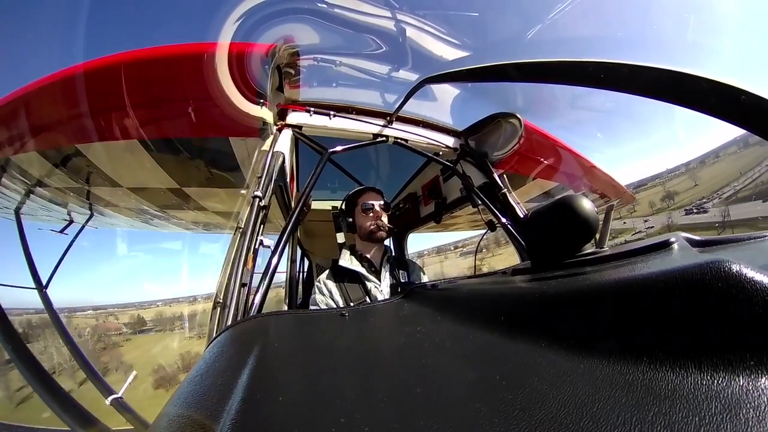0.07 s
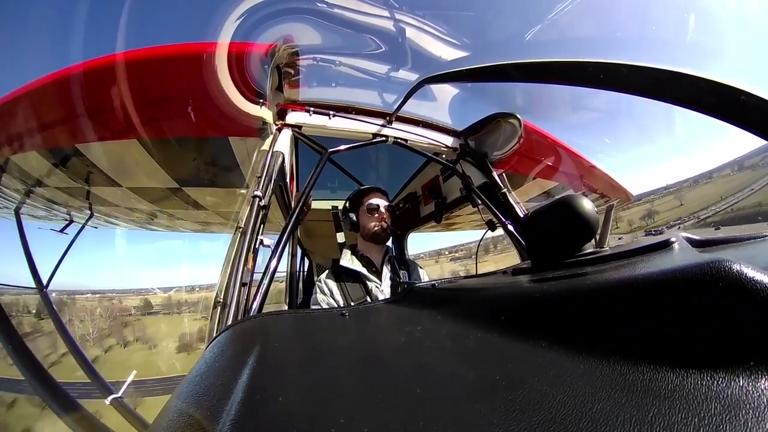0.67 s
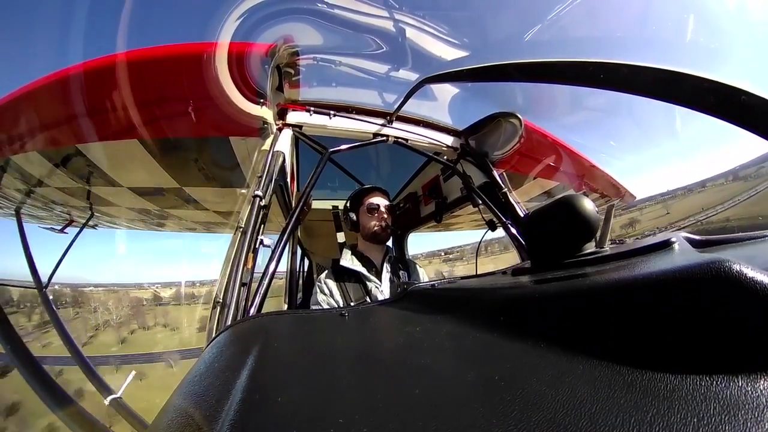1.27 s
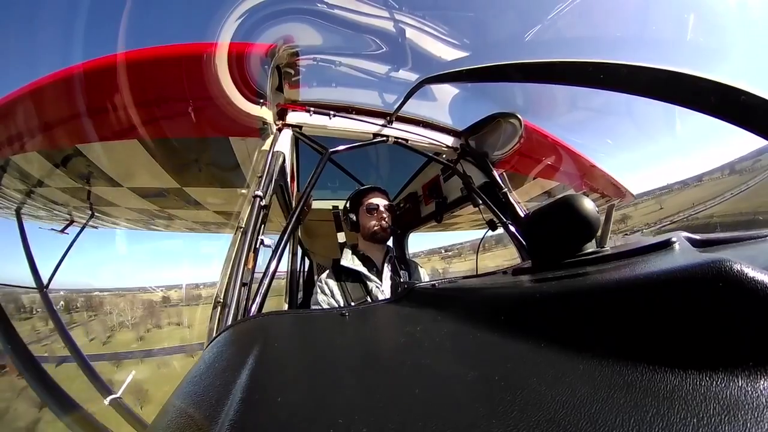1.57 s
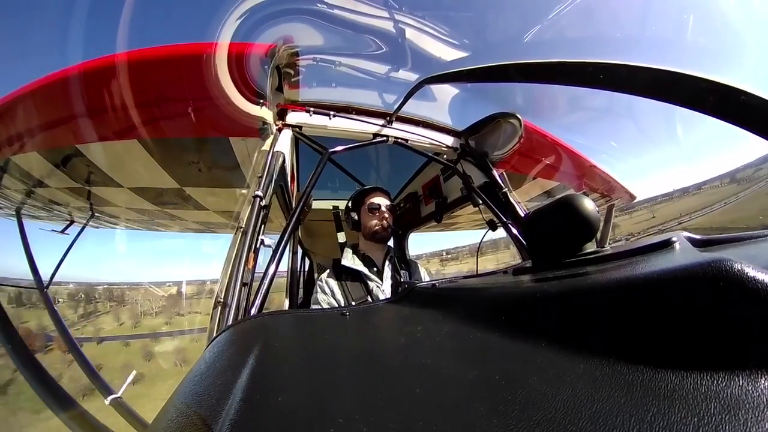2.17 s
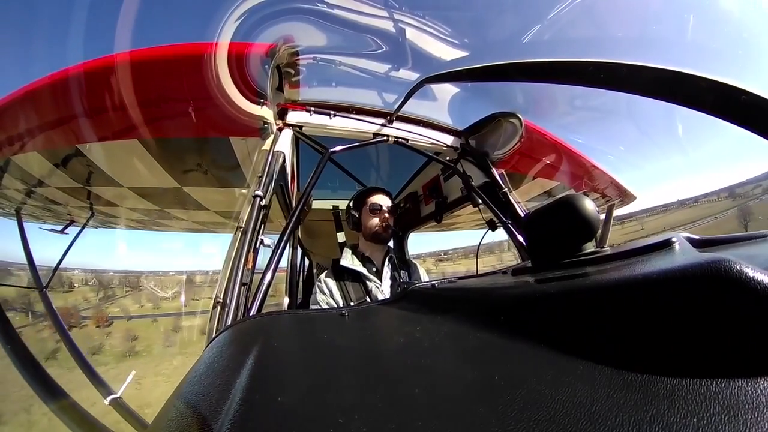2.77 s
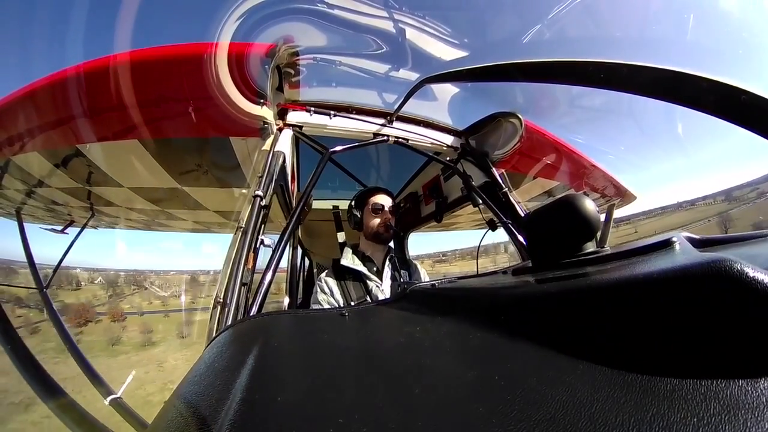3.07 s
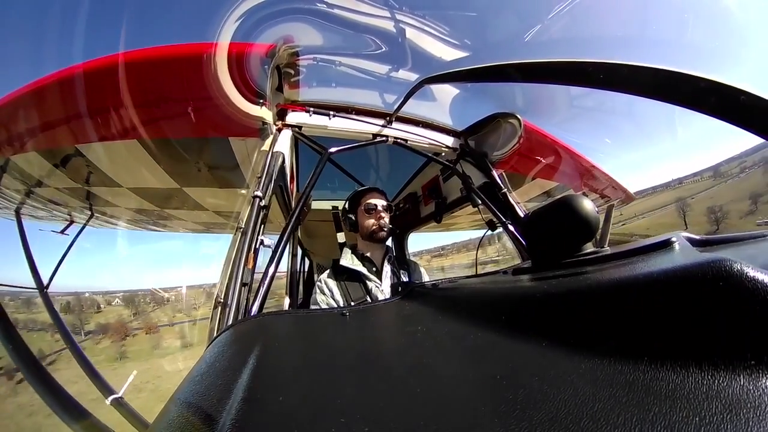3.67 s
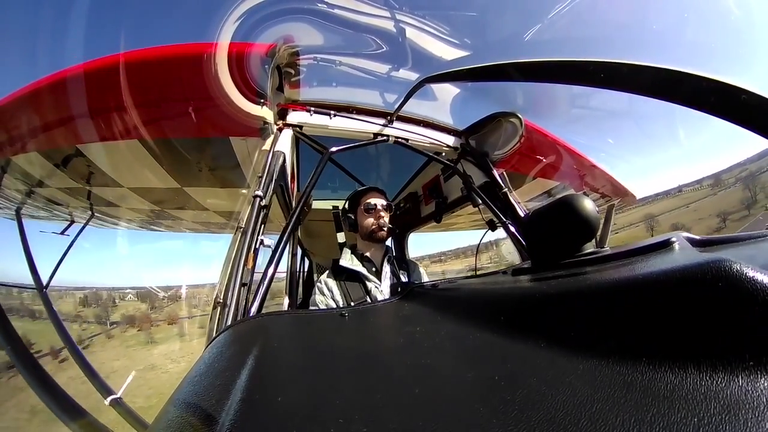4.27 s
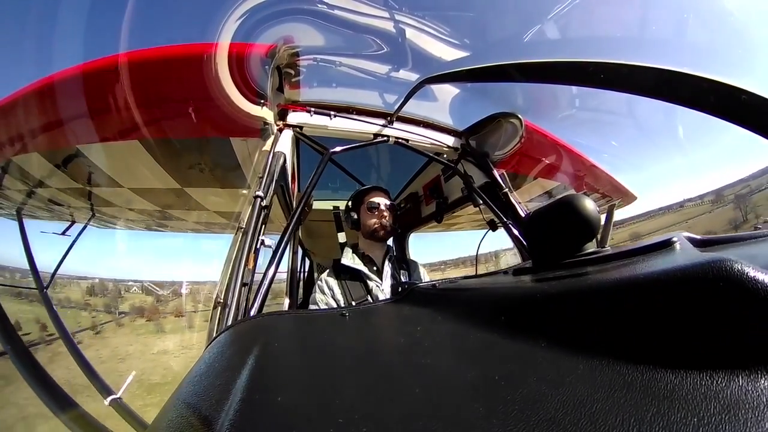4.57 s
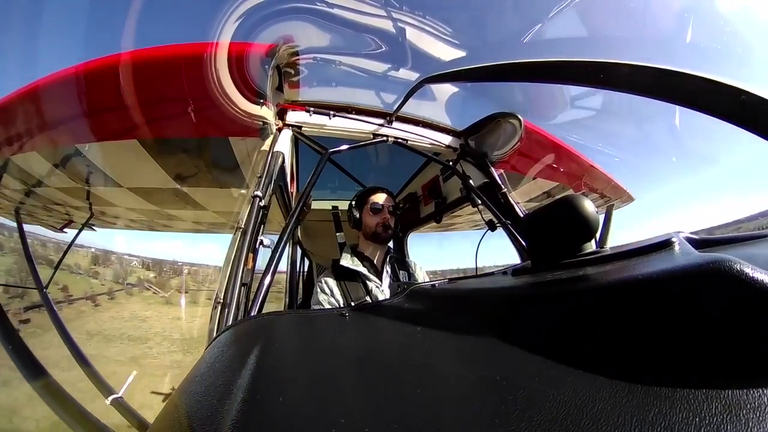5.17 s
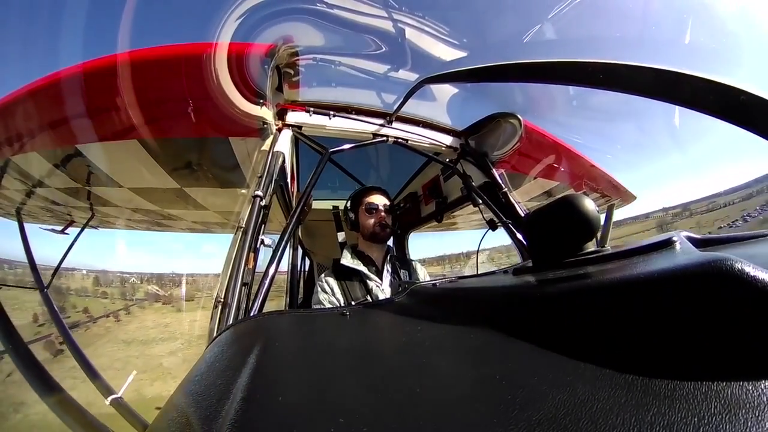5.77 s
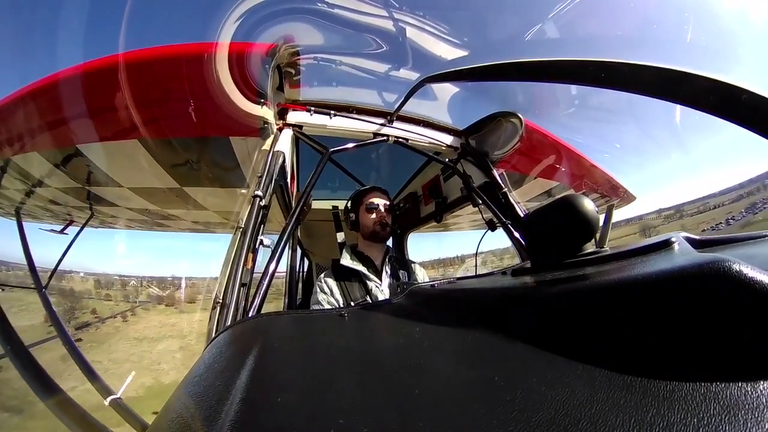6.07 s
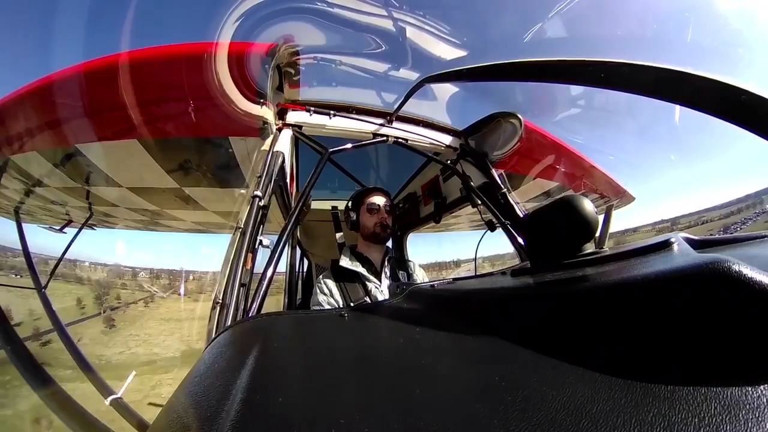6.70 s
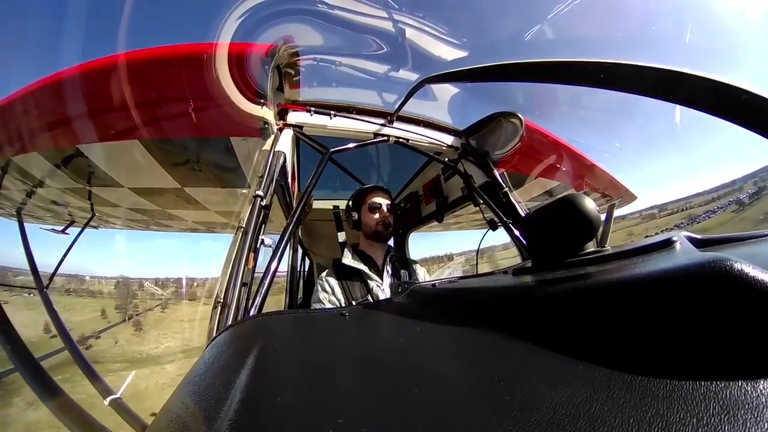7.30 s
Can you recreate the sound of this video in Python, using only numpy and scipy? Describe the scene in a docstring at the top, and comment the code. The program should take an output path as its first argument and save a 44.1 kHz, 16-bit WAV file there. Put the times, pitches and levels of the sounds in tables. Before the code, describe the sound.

A light aircraft's engine and propeller drone continuously, heard close up in stereo from within the cabin, with air rumbling past and small shudders of the airframe. The pitch eases slowly down as the engine pulses more unevenly. From about halfway, irregular wind buffeting adds booms and fluttering slaps, growing strongest toward the end, where it overloads the microphone with sharp crackles.

```python
"""Cockpit of a light aircraft in a turn, heard from a stereo microphone inside the cabin.
At first the two-blade propeller drones over the four-cylinder engine's exhaust and the slipstream.
From about 2 s the engine slowly loses speed and lopes harder. From 4 s the blades meet gusts: the cabin
booms and each pass slaps the windscreen. After 6 s the hardest slaps crackle and hit the limiter."""
import sys
import numpy as np
from scipy import signal
from scipy.fft import rfft, irfft, next_fast_len
from scipy.io import wavfile
from scipy.ndimage import uniform_filter1d, minimum_filter1d

SR = 44100
rng = np.random.default_rng(int(sys.argv[2]) if len(sys.argv) > 2 else 0)


def generate_wav(sig):
    """Save sig (samples, or channels by samples) to the path in sys.argv[1] as 16-bit PCM at SR."""
    pcm = np.round(np.clip(np.atleast_2d(sig).T, -1, 1) * 32767).astype(np.int16)
    wavfile.write(sys.argv[1], SR, pcm)


N = 323694
TIME = np.arange(N) / SR
PASSES_PER_CYCLE = 4   # one cylinder fires for every blade pass

# spectrum of tumbling air and exhaust gas: f/Hz, relative density/dB
RUMBLE_SPECTRUM = [(20, -44.5), (45, -35), (80, -11.5), (125, 1.5), (200, 0.5), (320, 0), (430, -2),
                   (560, -8), (900, -15.5), (1100, -34.5), (1600, -47.5), (3000, -71.5), (15000, -89.5)]
# the cabin's lean to one side at the microphone: f/Hz, left minus right/dB
CABIN_BALANCE = [(30, -9), (70, -1), (140, 8.5), (320, 7), (500, 4), (750, 6), (1130, 0), (2600, -0.5),
                 (9000, -5.5)]


def drone(passes, waver_db=0.83, flutter_db=1.3, flutter_hz=9, flutter_radians=0.16):
    """The blades' steady pressure field: three tones that crest together and flutter in uneven inflow."""
    # lowest propeller tones: t/s, first/dB, second/dB, third/dB
    tone_levels = [(0.0, -30, -31, -25), (0.5, -32.5, -23.5, -26.5), (1.0, -29.5, -24.5, -28.5),
                   (1.65, -29.5, -20, -28.5), (1.951, -37, -26.5, -23), (2.9, -49, -48, -20.5),
                   (3.45, -43, -27.5, -23.5), (3.75, -49, -35, -17.5), (3.92, -46, -46, -23.5),
                   (4.15, -38, -27.5, -24), (4.4, -33.5, -27.5, -18), (4.65, -37, -35, -24.5),
                   (4.95, -34, -20.5, -21.5), (5.15, -39.5, -28.5, -38), (5.849, -34, -28.5, -28.5),
                   (6.249, -46.5, -13.5, -24), (6.949, -43, -52, -29.5), (7.3, -47, -50, -16)]
    crest = np.interp(TIME, [3.8, 5.0], [.29, -.04])   # in rough air the crest moves onto the slap
    tones = 0
    for k, level_db in enumerate(in_time(tone_levels), 1):
        gain = from_db(level_db + waver_db * drift(0.46) + flutter_db * drift(flutter_hz))
        phase = 2 * np.pi * k * (passes - crest) + flutter_radians * drift(flutter_hz)
        tones = tones + gain * np.cos(phase)
    return np.sqrt(2) * tones * pan(left_db=4.0)


def overtones(passes, rate, waver_db=2.55, top_harmonic=15):
    """The drone's upper harmonics rise and sink as the speed slides them through cabin resonances."""
    # harmonics as the cabin passes them: f/Hz, level/dB
    cabin_response = [(250, -28), (268, -41), (276, -32), (320, -36), (345, -36), (398, -31), (415, -42.5),
                      (480, -37.5), (540, -47.5), (620, -46.5), (690, -45.5), (760, -61.5), (830, -47.5),
                      (900, -52.5), (1000, -53.5), (1100, -60.5)]
    tones = 0
    for k in range(4, top_harmonic + 1):
        level_db = at_hz(cabin_response, k * rate) + waver_db * drift(16.0)
        tones = tones + from_db(level_db) * np.cos(2 * np.pi * (k * passes + rng.random()))
    return np.sqrt(2) * tones * pan(left_db=0.0)


def gusts(rise_db_per_s=411, fall_db_per_s=250, lull_boom_db=-19.5, lull_slap_db=-44):
    """Drive of boom and slap in dB: each gust rises, holds and falls back to the lull."""
    # gusts that meet the propeller: start/s, length/s, boom drive/dB, slap drive/dB
    gust_events = [(4.111, 0.11, -17, -39.5), (4.269, 0.073, -22.5, -35.5), (4.336, 0.035, -17.5, -37),
                   (4.418, 0.058, -15, -46), (4.754, 0.06, -15, -29.5), (4.854, 0.15, -10, -24.5),
                   (5.364, 0.043, -15.5, -47), (5.513, 0.17, -15.5, -37), (5.785, 0.044, -19, -33.5),
                   (5.874, 0.025, -12, -45), (5.952, 0.033, -11, -23.5), (6.031, .07, -11, -32.5),
                   (6.109, 0.12, -5.5, -19), (6.271, 0.042, -5.5, -16.5), (6.317, 0.14, -9, -18),
                   (6.476, 0.245, -11, -18), (6.727, 0.4, -18, -22.5), (6.822, 0.012, -11.5, -19),
                   (7.062, 0.19, -13, -18.5), (7.247, 0.21, -8.5, -14.5)]
    boom_db, slap_db = np.full(N, lull_boom_db), np.full(N, lull_slap_db)
    for start, length, top_boom_db, top_slap_db in gust_events:
        rise_db = rise_db_per_s * (TIME - start)
        fall_db = fall_db_per_s * (start + length - TIME)
        shape_db = np.minimum(0, np.minimum(rise_db, fall_db))
        boom_db = np.maximum(boom_db, top_boom_db + shape_db)
        slap_db = np.maximum(slap_db, top_slap_db + shape_db)
    return boom_db, slap_db


def boom(passes, rate, boom_db, push_s=0.0005):
    """Each blade's pressure push sets the cabin ringing; hard pushes ring out of proportion."""
    # cabin resonances at the microphone: f/Hz, width/Hz, left/dB, right/dB
    cabin_modes = [(189, 18, -4.5, -9), (239.2, 6.7, 9.5, 4.5), (276.7, 45, 5.5, 0), (298, 21, -5.5, 9.5),
                   (364.7, 29, 11.5, 7.5), (422.3, 19, 3.5, 3), (599, 91, 8, -9.5)]
    since, strength = blade_clock(passes, rate, lead_s=0.00083, jitter_s=.00008, uneven_db=2.5)
    push = strength * bell(since, push_s)
    share_db = np.interp(boom_db, [-24, -15], [-9.0, -1.0])
    return ring(push, cabin_modes) * from_db(boom_db + share_db)


def hard_slaps(slap_db, reach_s=0.0085):
    """Single blade passes slap with a force of their own."""
    # hard passes: t/s, slap drive/dB
    hard_passes = [(4.443, -37), (4.474, -30), (4.491, -32.5), (4.556, -32), (4.683, -30), (4.875, -25),
                   (4.907, -22), (4.939, -22), (4.987, -24), (5.259, -33.5), (5.307, -36), (5.418, -39),
                   (5.530, -32), (5.579, -29.5), (5.692, -30), (5.788, -32), (5.949, -27), (6.079, -26.5),
                   (6.279, -8), (6.295, -12), (6.791, -27), (6.826, -18.5), (7.009, -13), (7.297, -9)]
    for s, level_db in hard_passes:
        slap_db = np.where(np.abs(TIME - s) < reach_s, level_db, slap_db)
    return slap_db


def slap(passes, rate, slap_db, edge_s=0.0001, lobe_s=0.00037, swish_s=0.0015, wave_db=10):
    """A blade in rough air throws an N-shaped wave that rings the windscreen, and a turbulent swish."""
    # windscreen resonances: f/Hz, width/Hz, gain/dB
    windscreen_modes = [(602, 100, -8), (900, 170, -7), (1243, 280, 1.5), (2250, 450, -3)]
    # turbulence round the blade: f/Hz, relative density/dB
    swish_spectrum = [(150, -13.5), (400, -6.5), (650, 11.5), (1000, 14), (1350, 3), (1650, -13.5),
                      (2300, -14), (2800, -18.5), (3300, -36.5), (6000, -63), (15000, -74.5)]
    since, strength = blade_clock(passes, rate, lead_s=0.00024, jitter_s=.00002, uneven_db=1.9)
    edge = edge_s * np.interp(slap_db, [-40, -24, -21.5], [2.6, 2.3, 1.0])   # strong waves steepen
    arrival = left_first(since, gap_s=0.00018)
    wave = -np.tanh(arrival / edge) * bell(arrival, lobe_s)
    ringing = sum(resonate(wave, hz, width) * from_db(db) for hz, width, db in windscreen_modes)
    smack = from_db(wave_db) * (wave + ringing * pan(left_db=-5.0))
    swish = even(noise(swish_spectrum), size=121) * bell(since, swish_s)
    swish_db = np.interp(slap_db, [-27, -20], [8.5, 4.5])   # a steep wave outweighs its swish
    share_db = np.interp(slap_db, [-47, -35], [-6.0, 0.0])
    return strength * from_db(slap_db + share_db) * (smack + from_db(swish_db) * swish)


def cracks(passes, rate, force_db, overload_db=-14, crackle_db=-25.5, snap_db=-6.5, fizz_db=-0.5):
    """The hardest slaps overload the recorder and crackle with a snap and fizz, singly or every pass."""
    # lone sharp cracks: t/s, height/dB
    lone_cracks = [(4.3557, -41), (4.9377, -32), (4.9846, -31), (5.9494, -42), (6.311, -16.5),
                   (6.361, -22.5), (6.743, -30.5), (6.81, -31), (6.8261, -25.5), (6.843, -36),
                   (6.8756, -38), (6.961, -36), (7.008, -37), (7.078, -24), (7.148, -26), (7.281, -15.5),
                   (7.297, -17)]
    # colour of snap and fizz: f/Hz, relative density/dB
    crack_spectrum = [(800, -2), (1500, 13), (2200, 11), (4500, -1), (7000, -8.5), (10000, -15),
                      (15000, -23.5)]
    since, strength = blade_clock(passes, rate, lead_s=0.00026, jitter_s=.00002, uneven_db=2.5)
    over_db = force_db - overload_db
    cut_in_db = 11 * np.minimum(over_db, 0)   # the crackle dies quickly below the overload threshold
    height = strength * from_db(crackle_db + 0.4 * over_db + cut_in_db)
    for s, height_db in lone_cracks:
        height[np.round(passes) == np.round(np.interp(s, TIME, passes))] = from_db(height_db)
    fizz = bell(since, 0.00086) * noise(crack_spectrum)
    arrived = np.sign(left_first(since, gap_s=0.00016))
    clicks = np.maximum(np.diff(arrived, prepend=1), 0)
    snap = fizz.std() * tint(clicks, crack_spectrum)
    return height * (from_db(snap_db) * snap + from_db(fizz_db) * fizz) * pan(left_db=4.0)


def exhaust(passes, uneven_db=11.0, puff=0.73, rise_passes=0.089, decay_passes=1.0, top_hz=1000):
    """Each cylinder barks into the pipe with a puff of gas; unequal strengths make the engine lope."""
    # cylinders in firing order: exhaust opens/blade passes, relative strength/dB
    cylinders = [(0.268, 6.5), (1.329, -2.5), (2.29, -6), (3.288, -13.5)]
    # exhaust pipe resonances: f/Hz, width/Hz, left/dB, right/dB
    pipe_modes = [(163, 7.7, -12.5, -11.5), (274, 48, 6.5, -3), (334, 47, 13, 0), (413, 25, 0.5, -4.5),
                  (497, 7.5, 2, -5), (690, 29, -24, -12.5), (830, 94, -20, -13.5)]
    bark, gas = np.zeros(N), np.zeros(N)
    for opens, level_db in cylinders:
        cycle = ((passes - opens) // PASSES_PER_CYCLE).astype(int) + 1
        age = (passes - opens) % PASSES_PER_CYCLE
        strength = from_db(level_db + uneven_db * rng.uniform(0.37, 1, cycle[-1] + 1))[cycle]
        bark += strength * np.diff(cycle, prepend=cycle[0])
        gas += strength * np.exp(-age / decay_passes) * (1 - np.exp(-age / rise_passes)) ** 2
    puffs = puff * rms_one(gas * noise(RUMBLE_SPECTRUM))
    return lowpass(ring(bark, pipe_modes) + puffs, top_hz, order=6)


def lope(passes, crest_passes=0.96):
    """One cylinder outweighs the rest, so the sound swells once in every engine cycle; in dB."""
    # throb of the labouring engine: t/s, swing/dB
    lope_depth = [(2.0, 1.6), (2.6, 3.0), (3.8, 3.0), (4.4, 1.2)]
    swing_db, = in_time(lope_depth)
    return swing_db * np.cos(2 * np.pi * (passes - crest_passes) / PASSES_PER_CYCLE)


def buzz(passes, rate, scatter_db=5.0, trade_hz=0.2635, count=66, size=4096):
    """The airframe shakes with each engine cycle: close lines between the blade tones, slowly shifting."""
    # airframe vibration lines: f/Hz, relative level/dB
    buzz_spectrum = [(90, -13.5), (150, 7), (200, -2), (300, 5.5), (370, -5), (470, -2), (560, -9.5),
                     (700, -4), (770, -22), (890, -18.5), (1000, -28.5), (1100, -30.5)]
    multiple = np.arange(count)
    hz = multiple * rate.mean() / PASSES_PER_CYCLE
    between_blade_tones = multiple % PASSES_PER_CYCLE > 0
    lines = from_db(at_hz(buzz_spectrum, hz)) * between_blade_tones * (hz > buzz_spectrum[0][0])
    place = passes / PASSES_PER_CYCLE % 1 * size
    shake = 0
    for turn in (np.cos, np.sin):   # two patterns of vibration give way to each other
        shared = np.exp(2j * np.pi * rng.random(count))
        per_side = np.exp(2j * np.pi * rng.random((2, count)))
        scatter = from_db(scatter_db * rng.standard_normal(count))
        weights = lines * scatter * (shared + 0.5 * per_side) * pan(at_hz(CABIN_BALANCE, hz))
        pattern = [np.interp(place, np.arange(size), side, period=size) for side in irfft(weights, size)]
        shake = shake + turn(2 * np.pi * trade_hz * TIME) * np.array(pattern)
    return rms_one(shake)


def shudders():
    """Strong engine beats and small bumps of air shake the cabin shell for a moment."""
    # brief shudders: t/s, half width/s, level/dB
    bumps = [(0.019, 0.0091, -18.5), (0.084, .012, -20.5), (0.311, 0.015, -24.5), (0.539, 0.029, -24),
             (0.61, 0.047, -27), (0.877, .012, -32), (0.941, 0.013, -21.5), (1.001, 0.019, -24.5),
             (1.98, 0.0074, -20), (2.064, .012, -21.5), (2.161, 0.023, -23), (2.518, 0.016, -18),
             (2.635, 0.02, -23), (2.699, 0.02, -20.5), (2.753, 0.015, -22), (2.816, 0.017, -17.5),
             (2.937, 0.02, -20), (3.058, 0.017, -17), (3.177, 0.017, -20.5), (3.302, 0.026, -20.5),
             (3.354, 0.016, -22.5), (3.41, 0.024, -21), (3.48, 0.013, -23), (3.561, 0.019, -20),
             (3.608, 0.015, -18.5), (3.672, 0.025, -28.5), (3.735, 0.021, -20.5), (3.787, 0.018, -21.5),
             (4.125, 0.021, -16), (4.355, 0.016, -16), (4.464, 0.031, -21), (4.685, 0.017, -23),
             (5.25, 0.028, -18), (5.39, 0.015, -23.5), (5.65, 0.025, -21.5)]
    # colour of the shaken shell: f/Hz, relative density/dB
    shell_spectrum = [(35, -70), (70, -38), (100, -18.5), (200, -9), (290, 11), (400, 7.5), (480, -1),
                      (700, -12), (950, -16), (1300, -60.5), (3000, -75), (8000, -110)]
    swell = sum(from_db(top_db) * bell(TIME - s, width) for s, width, top_db in bumps)
    shell = even(tint(rng.standard_normal(N), shell_spectrum), size=441)
    return swell * shell * pan(left_db=5.5)


def slipstream(passes, swell_db, boom_db, slap_db, level_flight_db=-24, chop=0.21):
    """Air tumbles over the cabin, chopped by the blades, and hisses at the door seals."""
    # slipstream over the cabin: t/s, level against level flight/dB
    airflow = [(0.0, -2), (0.4, -2), (0.55, 1.5), (1.15, 0.5), (1.55, 3.5), (2.1, 3.5), (2.4, 3),
               (3.15, 0.5), (3.4, 3), (3.75, 6), (3.88, -2.5), (4.03, 6), (4.17, 7.5), (4.7, 4.5), (5.0, 8),
               (5.15, -1.5), (5.45, 2), (5.6, 4.5), (7.0, 5.5)]
    # hiss at the door seals: t/s, level/dB
    seal_level = [(0.0, -45), (0.27, -43), (0.4, -43), (0.55, -43), (0.72, -40), (0.95, -40.5),
                  (1.5, -40.5), (1.9, -39.5), (2.27, -41.5), (2.5, -41), (3.17, -42.5), (3.3, -40),
                  (3.5, -37.5), (3.9, -42.5), (4.0, -37), (4.7, -39.5), (5.22, -37.5), (5.42, -41.5),
                  (5.6, -39), (7.0, -36.5)]
    # colour of that hiss: f/Hz, relative density/dB
    seal_spectrum = [(300, 1), (700, 0), (900, 5), (1120, 0.5), (1380, -0.5), (1620, -11), (1880, -8),
                     (2200, -17), (2800, -17), (3300, -25.5), (4200, -31), (5000, -33.5), (7500, -54),
                     (15000, -68)]
    flow_db, = in_time(airflow)
    seal_db, = in_time(seal_level)
    # both swell with the engine's lope, unless a gust stirs up more noise
    rumble_db = np.maximum(level_flight_db + flow_db + swell_db, boom_db - 9)
    hiss_db = np.maximum(seal_db + 0.57 * swell_db, slap_db - 10)
    rumble = noise(RUMBLE_SPECTRUM) * from_db(rumble_db + 0.47 * drift(3.6))
    hiss = noise(seal_spectrum) * from_db(hiss_db)
    return (1 + chop * np.cos(2 * np.pi * passes)) * (rumble + hiss)


def noise(spectrum):
    """Coloured cabin noise at the microphone, alike on both sides in some bands, diffuse in the treble."""
    # likeness of left and right: f/Hz, correlation/0-1
    likeness = [(30, 0), (110, 1), (190, 0.67), (300, 0), (520, 0), (900, 0.6), (1500, 0), (2600, 0)]
    size = next_fast_len(N, True)
    hz = np.arange(size // 2 + 1) * SR / size
    mid, side = rfft(rng.standard_normal((2, size)))
    alike = at_hz(likeness, hz)
    stereo = np.sqrt(1 + alike) * mid + np.sqrt(1 - alike) * side * [[1], [-1]]
    coloured = stereo * from_db(at_hz(spectrum, hz)) * pan(at_hz(CABIN_BALANCE, hz))
    return rms_one(irfft(coloured, size)[:, :N])


def blade_clock(passes, rate, lead_s, jitter_s, uneven_db):
    """Seconds from the nearest blade pass, and that pass's own strength."""
    nearest = np.round(passes).astype(int)
    timing, force = rng.standard_normal((nearest.max() + 1, 2)).T
    since = (passes - nearest) / rate + lead_s + jitter_s * timing[nearest]
    return since, from_db(uneven_db * force[nearest])


def left_first(since, gap_s):
    """Time on each channel for a wave that reaches the microphone's left side first."""
    return since + gap_s * np.array([[.5], [-.5]])


def resonate(x, hz, width_hz):
    """One resonance with gain 1 on top."""
    r = np.exp(-np.pi * width_hz / SR)
    feedback = [1, -2 * r * np.cos(2 * np.pi * hz / SR), r * r]
    return signal.lfilter(np.array([1, 0, -1]) * (1 - r * r) / 2, feedback, x + 1e-18)


def ring(x, modes):
    """Resonances with their own gain on each channel; power 1."""
    return rms_one(sum(resonate(x, hz, width) * from_db([[left], [right]])
                       for hz, width, left, right in modes))


def tint(x, spectrum):
    """Give a sound a colour; power 1."""
    size = next_fast_len(N, True)
    hz = np.arange(size // 2 + 1) * SR / size
    return rms_one(irfft(rfft(x, size) * from_db(at_hz(spectrum, hz)), size)[..., :N])


def even(x, size):
    """Hold a noise at a steady power over spans of so many samples."""
    power = np.mean(np.atleast_2d(x) ** 2, axis=0)
    return x / np.sqrt(uniform_filter1d(uniform_filter1d(power, size), size) + 1e-12)


def drift(hz, step=40, settle=2000):
    """Slow random wander of spread 1."""
    r = np.exp(-2 * np.pi * hz * step / SR)
    white = rng.standard_normal(N // step + settle + 2)
    slow = signal.lfilter([1], [1, -2 * r, r * r], white)[settle:]
    return np.interp(np.arange(N) / step, np.arange(len(slow)), rms_one(slow))


def lowpass(x, hz, order):
    """Round off the top."""
    return signal.sosfilt(signal.butter(order, hz, fs=SR, output="sos"), x)


def bell(t, width):
    """Gaussian pulse of height 1."""
    return np.exp(-.5 * (t / width) ** 2)


def from_db(db):
    """Decibels to gain."""
    return 10 ** (np.asarray(db) / 20)


def rms_one(x):
    """Scale to unit power."""
    return x / np.sqrt(np.mean(x ** 2) + 1e-20)


def in_time(rows):
    """The columns of a curve, sample by sample."""
    s, *columns = np.transpose(rows)
    return [np.interp(TIME, s, c) for c in columns]


def at_hz(points, hz):
    """Read a spectrum on a log-frequency axis."""
    f, value = np.transpose(points)
    return np.interp(np.log(np.maximum(hz, 1)), np.log(f), value)


def pan(left_db):
    """Channel gains that put the left so many dB above the right."""
    return from_db(np.array([[.5], [-.5]]) * left_db)


def scene(exhaust_db=-34.5, exhaust_db_per_hz=1.17, airframe_db=-31, airframe_db_per_hz=0.34):
    """One shaft times blades and cylinders; gusts drive boom, slap, crackle and air noise."""
    # propeller speed: t/s, blade passes/Hz
    blade_rate = [(0.0, 66.8), (0.4, 68.86), (0.9, 68.92), (1.4, 69.27), (1.8, 68.94), (2.3, 67.54),
                  (2.8, 66.68), (3.3, 66.42), (3.8, 65.26), (4.2, 63.79), (4.6, 62.79), (5.0, 62.44),
                  (5.4, 62.32), (5.8, 62.15), (6.2, 60.74), (6.6, 60.12), (7.0, 59.5), (7.34, 58.99)]
    rate, = in_time(blade_rate)
    passes = np.cumsum(rate) / SR
    boom_db, slap_db = gusts()
    rough_air = np.interp(TIME, [3.9, 4.1], [0, 1])
    buffet = rough_air * (boom(passes, rate, boom_db) + slap(passes, rate, hard_slaps(slap_db)))
    crackle = cracks(passes, rate, force_db=(boom_db + slap_db) / 2)
    swell_db = lope(passes)
    sag_hz = rate.mean() - rate   # exhaust and buzz grow as the engine is dragged down
    throb_db = exhaust_db + exhaust_db_per_hz * sag_hz + swell_db + 3.4 * drift(39.0)
    buzz_db = airframe_db + airframe_db_per_hz * sag_hz + swell_db
    buzz_db = np.maximum(buzz_db, boom_db - 14)   # gusts shake the airframe too
    engine = exhaust(passes) * from_db(throb_db) + buzz(passes, rate) * from_db(buzz_db)
    propeller = drone(passes) + overtones(passes, rate) + buffet + crackle
    return propeller + engine + shudders() + slipstream(passes, swell_db, boom_db, slap_db)


def record(dry, size=61, cutoff_hz=15000):
    """Behind the microphone a very fast limiter holds the peaks at full scale; the top is cut."""
    gain = minimum_filter1d(1 / np.maximum(np.abs(dry), 1), 2 * size + 1)
    gain = uniform_filter1d(uniform_filter1d(gain, size), size)
    return lowpass(dry * gain, cutoff_hz, order=14)


dry = scene()
out = record(dry)
generate_wav(out)
```